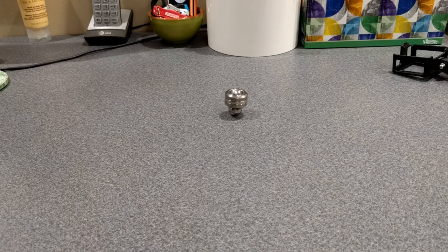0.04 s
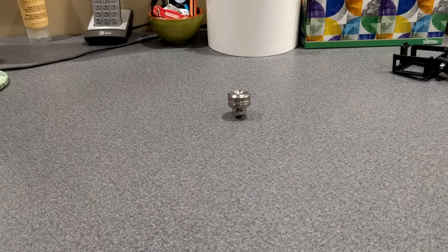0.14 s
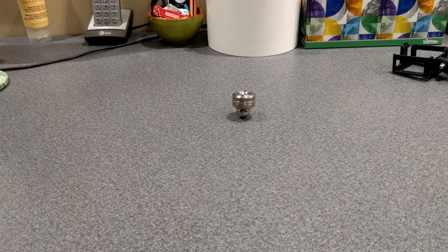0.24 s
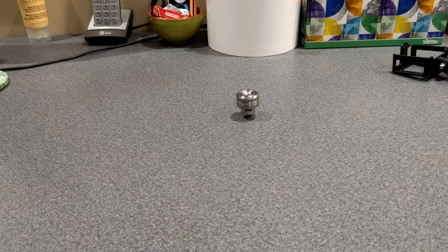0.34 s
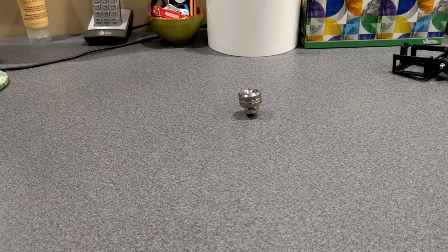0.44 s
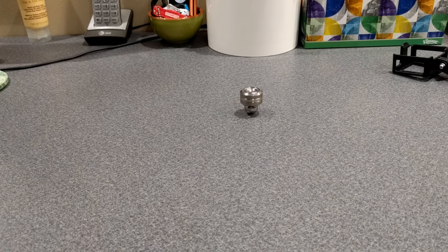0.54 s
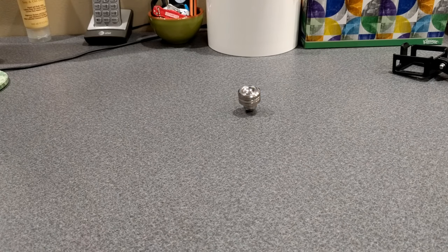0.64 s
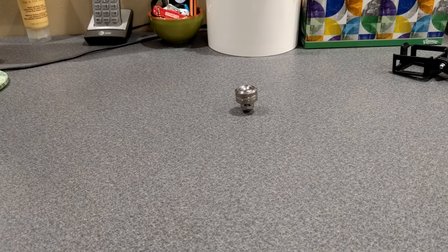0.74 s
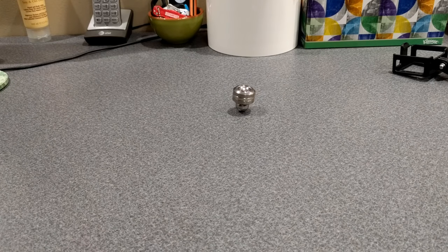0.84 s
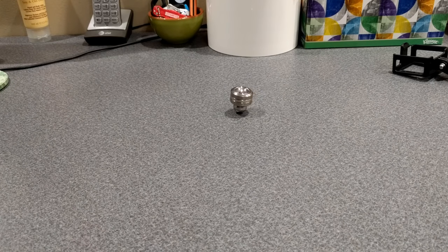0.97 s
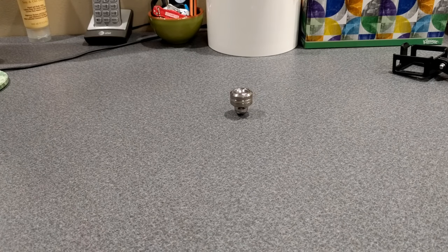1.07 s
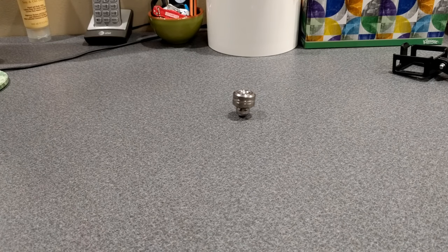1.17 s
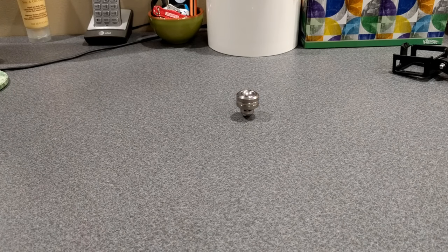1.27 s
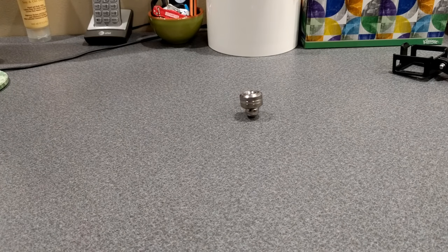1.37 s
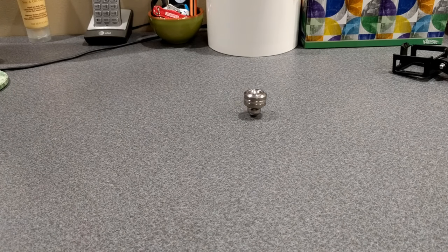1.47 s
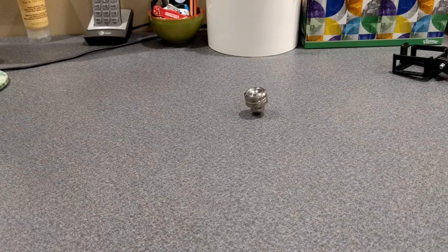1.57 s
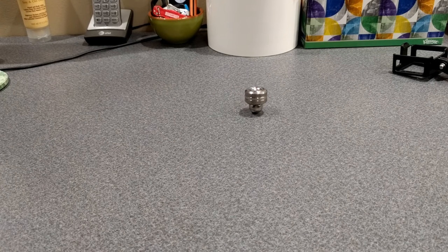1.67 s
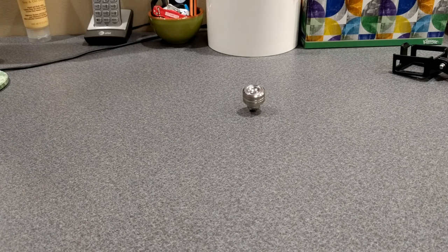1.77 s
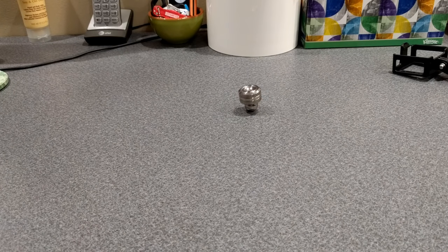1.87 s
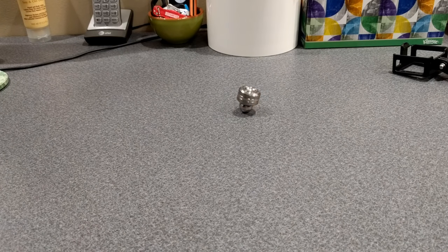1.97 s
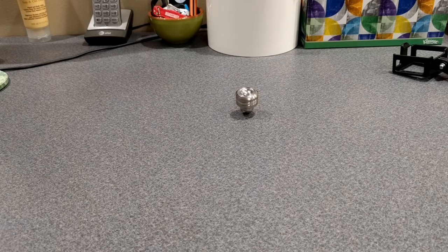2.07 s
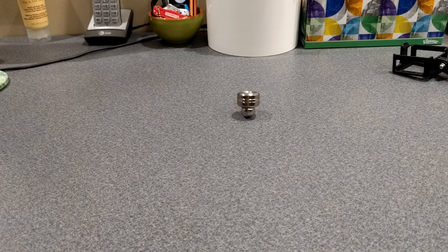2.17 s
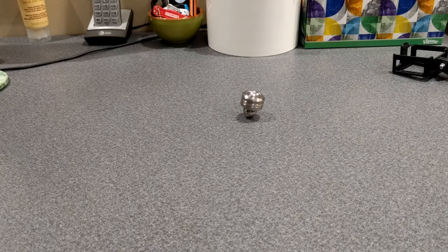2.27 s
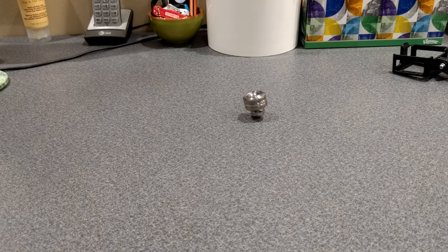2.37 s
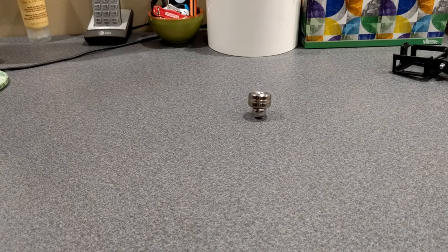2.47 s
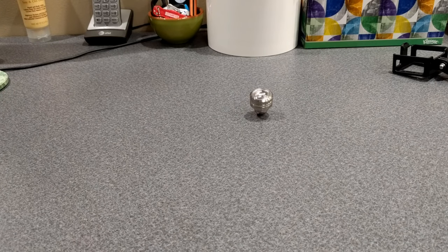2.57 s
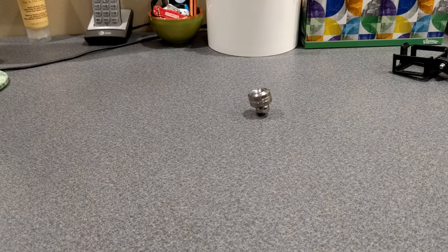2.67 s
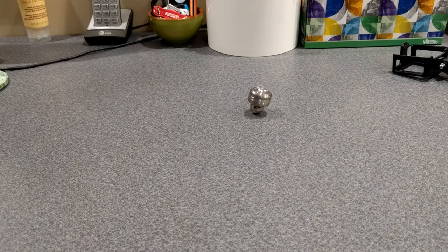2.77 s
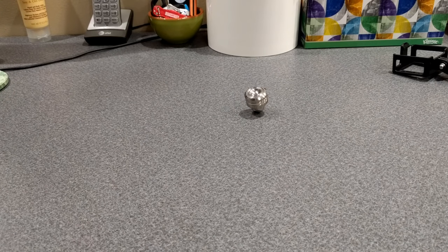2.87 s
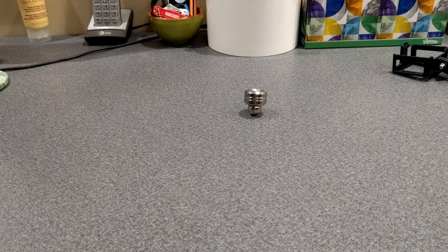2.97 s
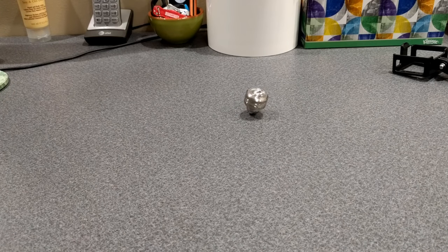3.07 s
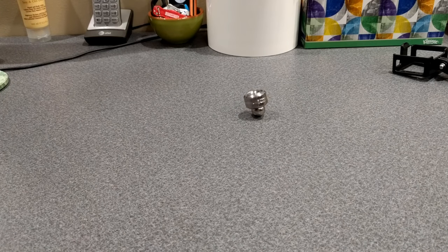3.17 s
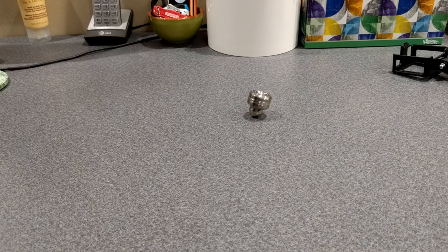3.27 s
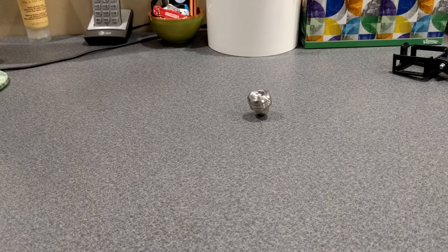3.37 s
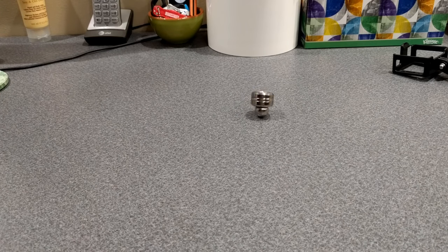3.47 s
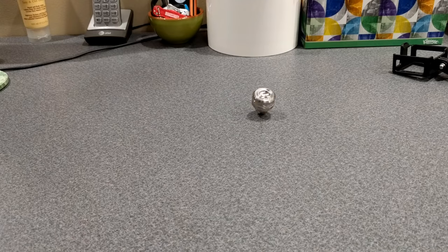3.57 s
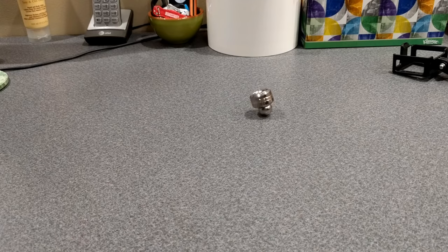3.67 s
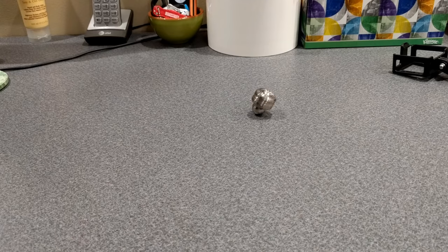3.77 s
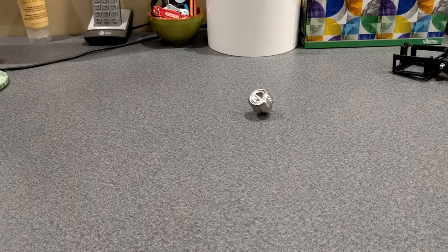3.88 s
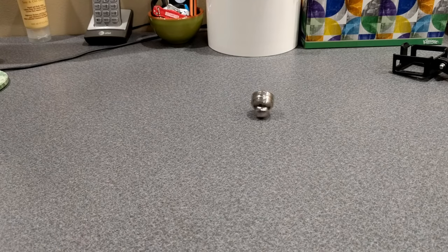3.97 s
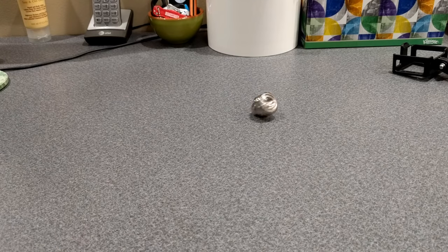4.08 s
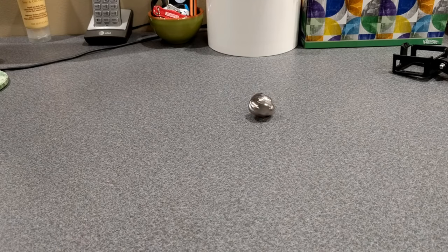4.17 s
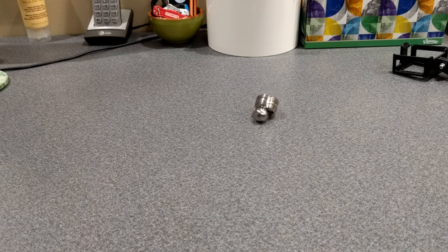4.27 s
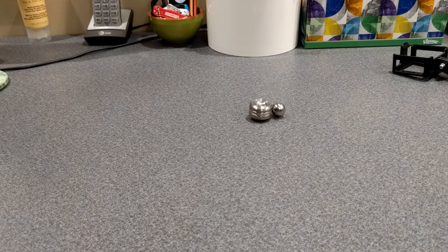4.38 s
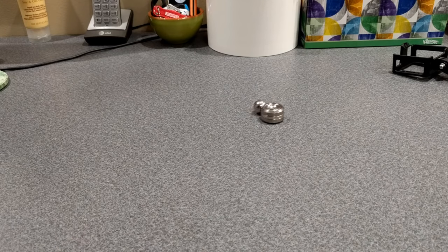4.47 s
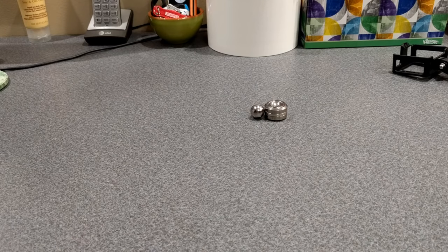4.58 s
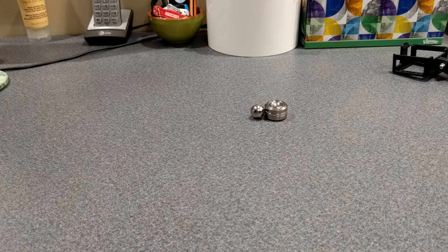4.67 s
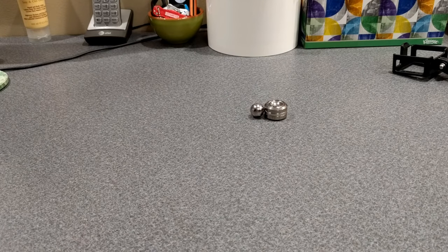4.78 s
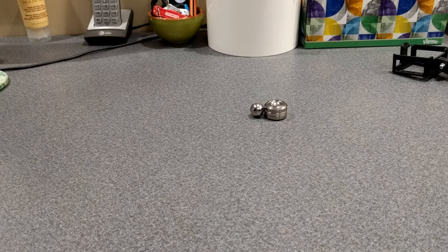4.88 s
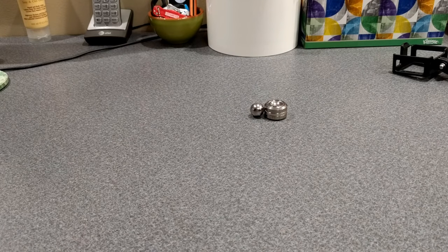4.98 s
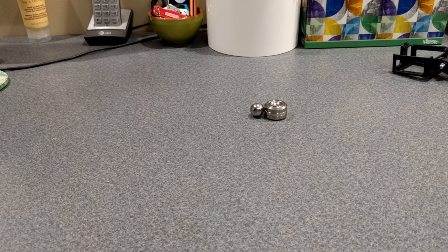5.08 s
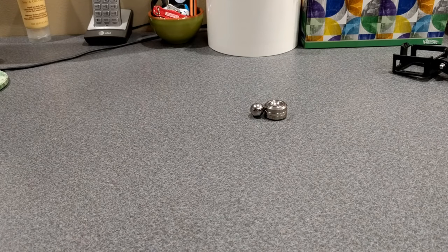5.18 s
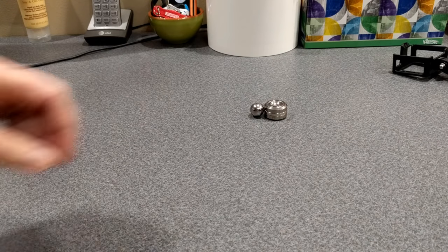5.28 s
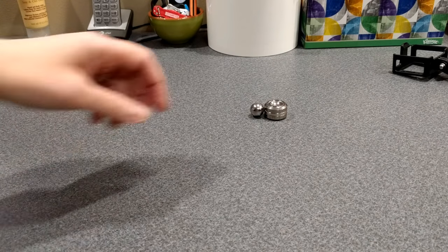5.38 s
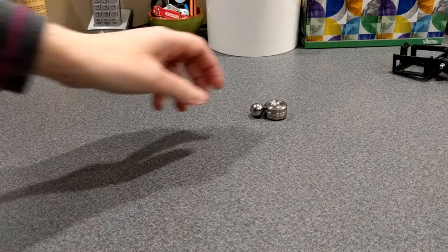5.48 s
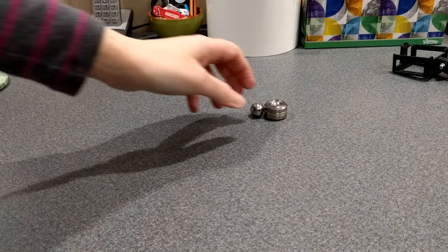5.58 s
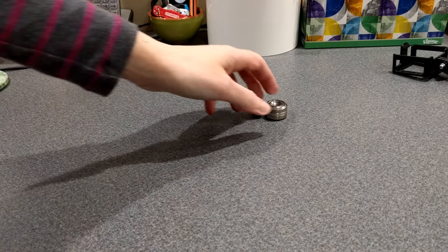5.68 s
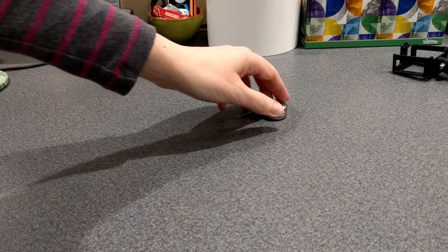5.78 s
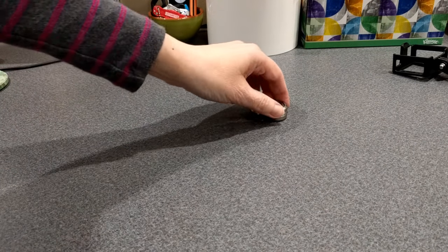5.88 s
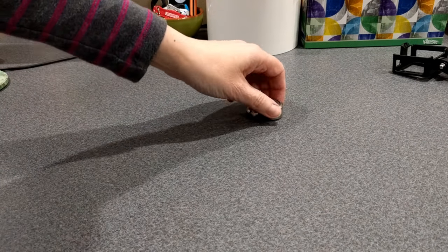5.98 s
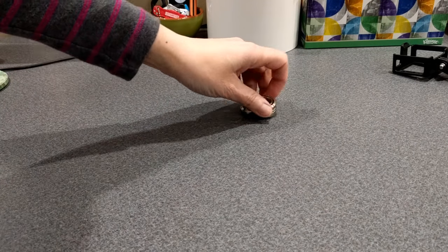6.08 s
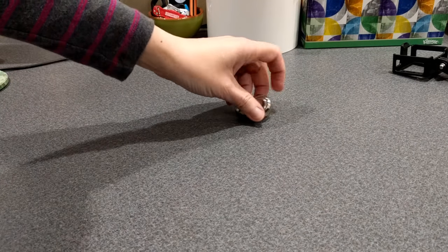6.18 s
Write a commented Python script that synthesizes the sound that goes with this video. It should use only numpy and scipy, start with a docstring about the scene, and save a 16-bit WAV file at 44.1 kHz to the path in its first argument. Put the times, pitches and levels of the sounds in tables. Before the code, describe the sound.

Quiet rhythmic grinding of a spinning metal top grows louder and rougher, ends in a bright clattering fall, then a few soft scrapes and taps.

```python
"""First a grinding murmur over faint hum: a small steel top spins on a laminate counter, swelling each wobble.
It leans until its rim rolls, topples with a clatter, skids and settles; then a hand takes hold of it.
Contacts are impacts or dense impact trains driving the counter's resonances; steel edges add sharp clinks.
Room reflections and a few long modes follow; filtered noise and sines make the air and the hum."""
import sys
import numpy as np
from scipy import signal
from scipy.fft import rfft, irfft
from scipy.io import wavfile

SR = 44100
rng = np.random.default_rng(int(sys.argv[2]) if len(sys.argv) > 2 else 0)


def wav_out(sig):
    """Save sig, one row per channel (or a flat mono array), as 16-bit PCM at SR to the path in sys.argv[1]."""
    wavfile.write(sys.argv[1], SR, np.round(np.clip(np.atleast_2d(sig).T, -1, 1) * 32767).astype(np.int16))


N = 274743
TIME = np.arange(N) / SR

# All levels are relative. Those of the spinning and leaning top precede the 1 dB cut in scene().
# room air spectrum: (frequency [Hz], density [dB])
AIR_COLOUR = [(20, -24.5), (45, -6.5), (90, -5), (130, -7), (180, -7), (250, -11), (500, -13), (800, -15.5),
              (1100, -18.5), (2150, -20.5), (2800, -23), (9500, -25.5), (11500, -19.5), (15800, -22.5)]
# appliance hum: (frequency [Hz], rms level [dB])
HUM_PARTIALS = [(59.2, -67), (167, -72.5), (183.7, -81.5), (318, -76), (753.8, -78.5), (2006, -81.5),
                (2188, -81)]
# room decay: (frequency [Hz], t60 [s])
ROOM_DECAY = [(100, 0.8), (500, 0.3), (1500, 0.29), (4000, 0.32), (12000, 0.55)]
# long-ringing modes of the room and the things on the counter: (frequency [Hz], level [dB])
LONG_MODES = [(854, -2), (953, -6), (1044, -5), (1184, -2), (1335, -6), (1507, -4), (1618, -6), (1855, -3),
              (1882, -3), (2110, -5), (2189, -5), (2560, -4), (2755, 0), (2784, -3), (2884, -3), (2962, -5),
              (3377, 0), (3607, -1), (3734, -2), (3784, -2)]
# counter resonances: (frequency [Hz], width [Hz], lift at ringing 1 [dB])
COUNTER_MODES = [(262, 27, 3.7), (393, 68, 7.6), (546, 43, 2.0), (614, 43, 4.8), (843, 51, 7.3),
                 (948, 85, 10.4), (1030, 69, 8.4), (1152, 91, 11.4), (1336, 105, 11.9), (1487, 43, 2.3),
                 (1609, 145, 14.2), (1867, 84, 9.4), (2098, 78, 7.9), (2191, 109, 11.7), (2472, 108, 4.7),
                 (2761, 81, 5.4), (2909, 198, 9.6), (3382, 57, 6.4), (3511, 163, 6.5), (3764, 107, 6.3),
                 (4308, 141, 6.0), (4558, 156, 7.9)]
# bending waves returning from the slab edges: (delay [s], share kept in first arrival [1])
EDGE_ECHOES = [(.0013, .8)]

# sleeve rustle spectrum: (frequency [Hz], level [dB])
SLEEVE_SPECTRUM = [(30, -40), (1000, -14), (2500, -5), (9000, -3), (16000, -12)]
# held top scraping, bright part: (frequency [Hz], level [dB])
SCRAPE_COLOUR = [(30, -41), (300, -6), (650, -5.5), (1000, 12.5), (1500, 2.5), (2200, -4.5), (3400, -11.5),
                 (4500, -22), (8000, -38), (15000, -52.5)]
# held top rocking, dull part: (frequency [Hz], level [dB])
ROCKING_COLOUR = [(30, -41), (120, -9.5), (300, -16), (550, -8), (850, 0), (1300, -17), (2000, -16.5),
                  (3000, -29.5), (4500, -33), (8000, -35), (15000, -34)]
# fingers push the top over the counter: (start [s], length [s], level [dB])
FINGER_PUSHES = [(5.815, 0.014, -47.5), (5.86, 0.11, -60), (5.968, 0.069, -37), (6.07, 0.024, -45.5),
                 (6.13, 0.024, -38), (6.19, 0.0054, -39.5)]
# fingers tip it against the surface: (time [s], peak [dB])
FINGER_TAPS = [(5.9525, -34), (5.968, -24), (5.9814, -23.5), (6.0107, -36), (6.0332, -29), (6.1323, -23.5),
               (6.1356, -18.5), (6.1568, -22.5)]
# fingernails brush the steel: (time [s], peak [dB])
NAIL_BRUSHES = [(5.722, -51), (5.737, -49)]

# clicks of steel edges: (time [s], peak [dB])
EDGE_CLICKS = [(2.033, -39), (2.045, -44), (4.2592, -10), (4.2742, -11.5), (4.2852, -7.5), (4.2863, 0),
               (4.2903, -14), (4.2962, -17)]
# steel snap spectrum: (frequency [Hz], level [dB])
STEEL_COLOUR = [(30, -43), (1000, -20.5), (3500, -10), (5500, 1.5), (8500, -3), (11000, -8), (14000, -2),
                (16000, -8)]
# fallen body bouncing, brighter on an edge: (time [s], peak [dB], tilt [dB/octave])
BODY_KNOCKS = [(4.2591, -6.5, -3), (4.2639, -7.5, -3), (4.2812, 1, -1), (4.2898, -4.5, -3),
               (4.3275, -8, -1.5), (4.3484, 1, -2), (4.365, 1.5, 0), (4.387, 0.5, 2), (4.3901, -5.5, 2.5),
               (4.3989, -2.5, 1), (4.418, -13.5, 7), (4.4216, -6, 3.5), (4.444, -12.5, -1.5),
               (4.4647, -17, -3.5)]
# body on counter: (frequency [Hz], level [dB])
BODY_COLOUR = [(30, -44), (90, -6), (200, -7.5), (400, -11.5), (700, -8), (1100, -1.5), (1800, 2),
               (2600, 4), (3500, -2), (4500, -12), (6500, -21), (9000, -34), (15000, -40.5)]

# flank rolling: (time [s], level [dB])
FLANK_ROLL = [(2.7, -73), (3.25, -57), (3.6, -52), (3.85, -35.5), (3.98, -30), (4.1, -24), (4.24, -26.5),
              (4.3, -30.5), (4.51, -30)]
# flank scrapes briefly before it stays down: (start [s], length [s], level [dB])
FLANK_TOUCHES = [(3.759, .008, -31), (3.791, .018, -28), (3.968, .014, -30)]
# flank on counter: (frequency [Hz], level [dB])
FLANK_COLOUR = [(30, -31.5), (90, -28), (180, -6.5), (300, -2.5), (600, 2), (1000, 2), (1600, -2.5),
                (2300, -8.5), (3200, -14), (4500, -21), (6500, -27), (9000, -33), (15000, -36.5)]
# steady tip grinding: (time [s], level [dB])
TIP_GRIND = [(0, -63.5), (2.0, -73), (3.55, -52.5), (3.8, -43.5), (3.95, -41), (4.3, -67.5)]
# tip tripping over larger bumps: (time [s], peak [dB])
BUMP_TICKS = [(0.237, -48), (0.7496, -37), (1.130, -39.5), (1.505, -37), (1.541, -36.5), (1.6917, -37),
              (1.936, -31), (2.1096, -33), (2.1375, -32), (2.3395, -30), (2.4833, -30.5), (2.7134, -29.5),
              (2.855, -37), (2.876, -30), (3.079, -32.5), (3.1078, -27), (3.1354, -26), (3.25, -36),
              (3.348, -31), (3.454, -30.5), (3.6666, -27)]
# tip bite at the height of a turn: (time [s], level [dB])
BITE_LEVEL = [(0.06, -61), (0.26, -54.5), (0.78, -53), (0.99, -62), (1.16, -54), (1.75, -52), (2.2, -45.5),
              (3.3, -46.5), (3.6, -41)]
# tip bite on counter: (frequency [Hz], level [dB])
BITE_COLOUR = [(30, -30), (90, -11.5), (200, -9.5), (380, -2), (520, 0.5), (700, -7.5), (950, -1),
               (1300, -20), (2000, -20.5), (3000, -25.5), (4500, -47), (8000, -31.5), (15000, -44)]
# dull rolling murmur: (frequency [Hz], level [dB])
MURMUR_COLOUR = [(30, -36), (90, -8.5), (130, -2), (200, -8.5), (400, -2), (550, 3.5), (700, -5.5),
                 (950, -16.5), (1300, -20.5), (2000, -29), (3000, -34.5), (4500, -50), (15000, -54)]

AIR_DB, BUZZ_DB, BUZZ_HZ = -59.5, -70, 58.4
ROOM_WET_DB, MODE_T60_S, CUTOFF_HZ = -9.5, .22, 15900
REBOUND_LOSS_DB = 8.5
SKID_START_S, SKID_RISE_S, SKID_DB, SKID_FADE_DB_PER_S = 4.39, .015, -28, 41.5
REST_S, STOP_DB_PER_S = 4.501, 381
# share of bite power moving from tip to flank as the top leans
LEAN_START_S, LEAN_PER_S = 1.52, .15
# axis circles about five times a second, each turn a little longer than the last
FIRST_WOBBLE_S, WOBBLE_PERIOD_S, PERIOD_GROWTH_S, WOBBLE_COUNT = .0625, .1808, .00112, 20
# swell lengths are at time zero; murmur level is relative to the bite
BITE_LEAD_S, BITE_LENGTH_S, SWELL_WIDENS_PER_S = .0064, .071, .12
MURMUR_LAG_S, MURMUR_LENGTH_S, MURMUR_DB = .024, .093, -2.0


def from_db(db):
    """Decibels to gain."""
    return 10 ** (np.asarray(db) / 20)


def rms_one(x):
    """Scale to unit rms."""
    return x / np.sqrt(np.mean(x ** 2) + 1e-20)


def level(rows):
    """Gain curve from rows (time [s], level [dB])."""
    return from_db(np.interp(TIME, *np.transpose(rows)))


def at_hz(points, hz):
    """Interpolate a table on a log-frequency axis."""
    freqs, values = np.transpose(points)
    return np.interp(np.log(hz + 1e-9), np.log(freqs), values)


def through(x, response):
    """Convolve with an impulse response, keeping the length."""
    return signal.fftconvolve(x, response)[:len(x)]


def body(colour, modes=(), size=16384):
    """Minimum-phase, unit-energy impulse response of a smooth colour lifted by resonances."""
    hz = np.arange(size // 2 + 1) * SR / size
    db = at_hz(colour, hz)
    for centre, width, lift in modes:
        db = db + lift / (1 + (2 * (hz - centre) / width) ** 2)
    # causal cepstrum: the blow comes first, the ringing follows
    cepstrum = irfft(np.log(from_db(db)))[:size // 2]
    response = irfft(np.exp(2 * rfft(cepstrum, size)))[:size // 2]
    return response / np.linalg.norm(response)


def noise(colour):
    """Coloured noise, unit rms."""
    return rms_one(through(rng.standard_normal(N), body(colour)))


def background():
    """Air noise, hum partials and a faint electrical buzz pulsing the top of the hiss."""
    hum = 0
    for hz, db in HUM_PARTIALS:
        phase = 2 * np.pi * (hz * TIME + rng.random())
        hum = hum + from_db(db) * np.sqrt(2) * np.sin(phase)
    high_pass = signal.butter(8, 10800, "high", fs=SR, output="sos")
    treble = signal.sosfilt(high_pass, rng.standard_normal(N))
    pulses = np.sin(np.pi * BUZZ_HZ * TIME) ** 4  # BUZZ_HZ pulses per second
    buzz = from_db(BUZZ_DB) * rms_one(treble * pulses)
    return from_db(AIR_DB) * noise(AIR_COLOUR) + hum + buzz


def room(x, build_s=.0023, mode_db=-13.5, size=32768):
    """Diffuse reflections build up in milliseconds and decay by band; a few modes stand out."""
    t, hz = TIME[:size], np.arange(size // 2 + 1) * SR / size
    white = rfft(rng.standard_normal(size))
    tail = 0
    for centre, t60_s in ROOM_DECAY:
        band = at_hz([(f, f == centre) for f, _ in ROOM_DECAY], hz)
        tail = tail + irfft(white * band) * from_db(-60 * t / t60_s)
    tail = tail * (1 - np.exp(-(t / build_s) ** 2))
    tail = from_db(ROOM_WET_DB) * tail / np.linalg.norm(tail)
    fade = from_db(-60 * t / MODE_T60_S)
    modes = sum(from_db(db + mode_db) * np.cos(2 * np.pi * f * t) for f, db in LONG_MODES)
    modes = modes * 2 * fade / fade.sum()
    return x + through(x, modes + tail)


def slab(colour, ringing=1.0, slow_s=.0003):
    """Counter under one contact: ringing scales resonance lifts; dispersion delays bending waves."""
    response = body(colour, [(hz, width, lift * ringing) for hz, width, lift in COUNTER_MODES])
    hz = np.arange(len(response) // 2 + 1) * SR / len(response)
    # low bending waves travel more slowly; slow_s is their delay at 1 kHz
    travel = np.exp(-4j * np.pi * slow_s * np.sqrt(1000 * hz))
    for delay_s, share in EDGE_ECHOES:
        echo = np.exp(-2j * np.pi * hz * delay_s)
        travel = travel * (share + echo) / (1 + share * echo)  # all-pass
    return irfft(rfft(response) * travel)


def blows(rows, response):
    """Single impacts (time [s], peak [dB]) on a peak-normalised response."""
    force = np.zeros(N)
    times, peak_db = np.transpose(rows)
    force[np.round(times * SR).astype(int)] = from_db(peak_db)
    return through(force, response / np.abs(response).max())


def grind(gain, response, per_s, spread_db, even_s):
    """Steel over laminate grain: a dense random train of tiny uneven impacts."""
    hits = rng.random(N) < per_s / SR
    sizes = from_db(spread_db * rng.standard_normal(N))
    force = hits * sizes * rng.choice([-1, 1], N)
    # the weight of the top keeps mean force steady over a few impacts
    window = np.hanning(int(even_s * SR))
    power = signal.fftconvolve(force ** 2, window / window.sum(), "same")
    return through(gain * force / np.sqrt(np.abs(power) + 1e-9), response)


def strokes(rows, attack_s, release_s):
    """Gain of strokes (start [s], length [s], level [dB]): exponential rise, hold, decay."""
    gain = 0
    for start_s, length_s, db in rows:
        rise = np.maximum(start_s - TIME, 0) / attack_s
        fall = np.maximum(TIME - start_s - length_s, 0) / release_s
        gain = gain + from_db(db) * np.exp(-rise - fall)
    return gain


def moving():
    """Unit gain until the top comes to rest, then a steady dB fall."""
    return from_db(-STOP_DB_PER_S * np.maximum(TIME - REST_S, 0))


def wobble(lag_s, length_s, steepness=3.2):
    """One swell per turn of the axis, at the bite level, broadening with time."""
    turn = np.arange(WOBBLE_COUNT)
    times = FIRST_WOBBLE_S + turn * (WOBBLE_PERIOD_S + PERIOD_GROWTH_S * turn / 2)
    gains = from_db(np.interp(times, *np.transpose(BITE_LEVEL)))
    lengths = length_s * (1 + SWELL_WIDENS_PER_S * times)
    swells = 0
    for time_s, gain, width_s in zip(times, gains, lengths):
        offset = np.abs(2 * (TIME - time_s - lag_s) / width_s)
        swells = swells + gain / (1 + offset ** (2 * steepness))
    return swells


def picking_up(sleeve_db=-62.5, scrape_db=-3.0, rocking_db=-4.0):
    """Sleeve noise swells past; nails brush; the held top scrapes, rocks and taps the counter."""
    reach = np.exp(-((TIME - 5.24) / .085) ** 2)
    sleeve = from_db(sleeve_db) * reach * noise(SLEEVE_SPECTRUM)
    bright, dull = slab(SCRAPE_COLOUR, ringing=.6), slab(ROCKING_COLOUR, ringing=.7)
    push = strokes(FINGER_PUSHES, attack_s=.012, release_s=.016)
    scrape = grind(from_db(scrape_db) * push, bright, per_s=1000, spread_db=3.0, even_s=.012)
    rocking = grind(from_db(rocking_db) * push, dull, per_s=740, spread_db=3.0, even_s=.014)
    nails = blows(NAIL_BRUSHES, slab(BODY_COLOUR))
    taps = blows(FINGER_TAPS, bright + .24 * dull)
    return sleeve + nails + scrape + rocking + taps


def clinks(ring_db=-.5, ring_t60_s=.033, shimmer_db=-11.5, shimmer_t60_s=.35):
    """A steel edge snaps, rings briefly as decaying noise (many high modes) and shimmers faintly."""
    snap = body(STEEL_COLOUR, size=32768)
    t = TIME[:len(snap)]
    ring = 0
    for db, t60_s in (ring_db, ring_t60_s), (shimmer_db, shimmer_t60_s):
        dying = rng.standard_normal(len(t)) * from_db(-60 * t / t60_s)
        ring = ring + from_db(db) * dying / np.linalg.norm(dying)
    return blows(EDGE_CLICKS, snap + through(ring, snap))


def toppling():
    """The body strikes the counter, each knock with a small rebound; a fading skid ends at rest."""
    knocks = 0
    for time_s, db, tilt in BODY_KNOCKS:
        colour = []
        for hz, colour_db in BODY_COLOUR:
            octaves = np.log2(np.clip(hz, 500, 5000) / 2000)
            colour.append((hz, colour_db + tilt * octaves))
        rebound = (time_s + rng.uniform(.0028, .0035), db - REBOUND_LOSS_DB)
        knocks = knocks + blows([(time_s, db), rebound], slab(colour, ringing=.55))
    age_s = TIME - SKID_START_S
    rise = np.exp(np.minimum(age_s, 0) / SKID_RISE_S)
    fade = from_db(SKID_DB - SKID_FADE_DB_PER_S * np.maximum(age_s, 0))
    sliding = rise * fade * moving()
    skid = grind(sliding, slab(BODY_COLOUR, ringing=.7), per_s=1100, spread_db=5.0, even_s=.009)
    return knocks + skid


def leaning():
    """The flank touches down, then rolls: sparser, more uneven impacts than the tip's murmur."""
    touches = strokes(FLANK_TOUCHES, attack_s=.002, release_s=.0027)
    load = level(FLANK_ROLL) * moving() + touches
    return grind(load, slab(FLANK_COLOUR), per_s=520, spread_db=5.0, even_s=.02)


def spinning():
    """The tip murmurs, trips on bumps and bites once per wobble, the bite moving to the flank."""
    tip, flank = slab(BITE_COLOUR, ringing=.87), slab(FLANK_COLOUR)
    lean = np.clip(LEAN_PER_S * (TIME - LEAN_START_S), 0, 1)
    murmur_swells = from_db(MURMUR_DB) * (1 - lean) * wobble(MURMUR_LAG_S, MURMUR_LENGTH_S)
    rolling = level(TIP_GRIND) * moving() + murmur_swells
    murmur = grind(rolling, slab(MURMUR_COLOUR), per_s=2100, spread_db=3.0, even_s=.028)
    bite_swells = wobble(-BITE_LEAD_S, BITE_LENGTH_S)
    bite = 0
    for share, contact in (1 - lean, tip), (lean, flank):
        gain = bite_swells * np.sqrt(share)  # share of power
        bite = bite + grind(gain, contact, per_s=450, spread_db=5.0, even_s=.028)
    ticks = blows(BUMP_TICKS, tip + .2 * flank)
    return murmur + bite + ticks


def scene():
    """The top and the hand in the room, over the background."""
    rolling = from_db(-1.0) * (spinning() + leaning())
    top = rolling + toppling() + clinks()
    return (room(top + picking_up()) + background())[None]


def record(dry):
    """Clip at full scale, then cut the top of the band."""
    low_pass = signal.ellip(10, .1, 80, CUTOFF_HZ, fs=SR, output="sos")
    return signal.sosfilt(low_pass, np.clip(dry, -1, 1))


dry = scene()
out = record(dry)
wav_out(out)
```